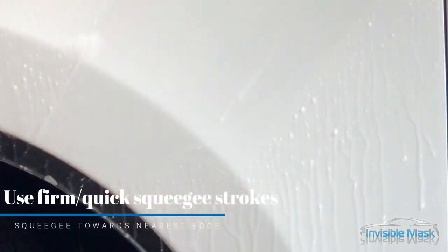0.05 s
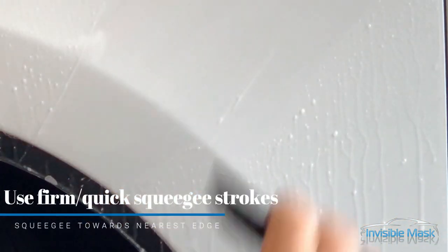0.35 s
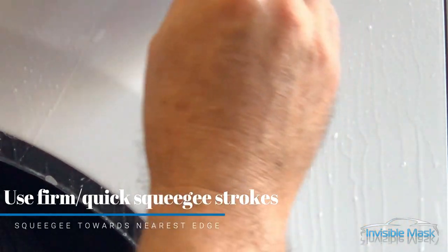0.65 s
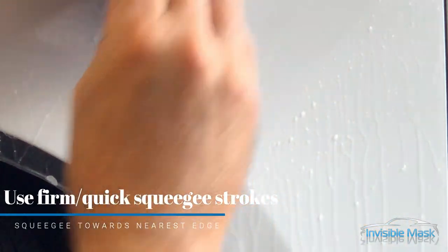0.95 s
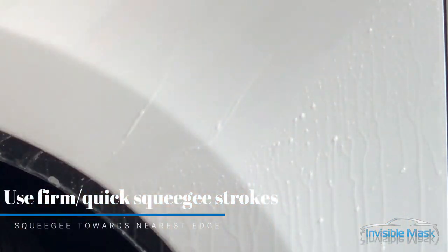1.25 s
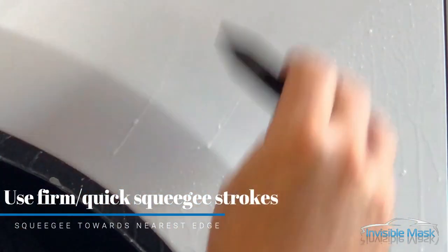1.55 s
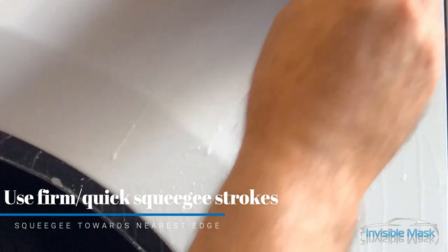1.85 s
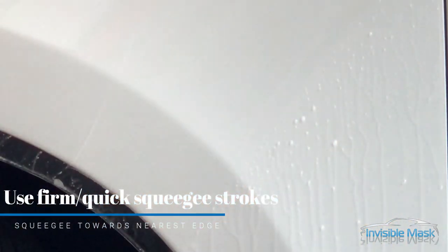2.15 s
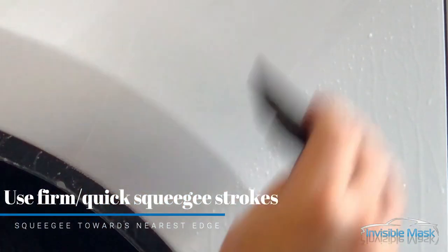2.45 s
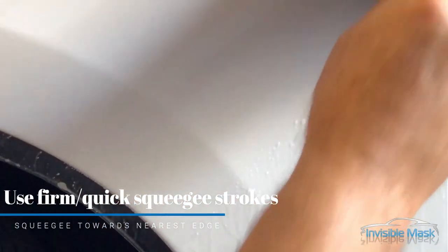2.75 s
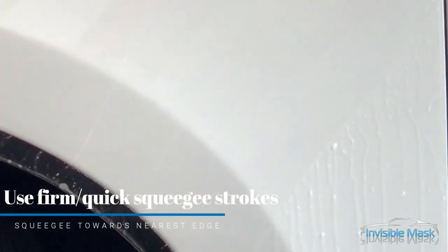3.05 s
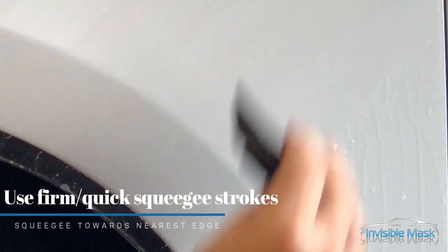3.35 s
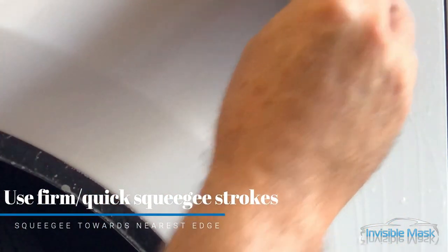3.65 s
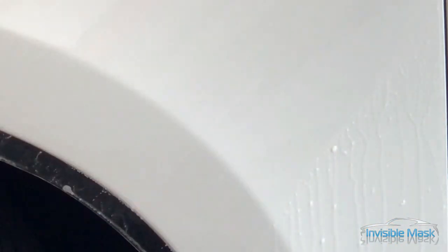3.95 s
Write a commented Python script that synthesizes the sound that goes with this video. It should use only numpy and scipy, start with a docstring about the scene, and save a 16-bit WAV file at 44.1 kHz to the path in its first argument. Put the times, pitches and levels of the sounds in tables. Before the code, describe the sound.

A squeegee is pulled quickly over wet film on a car panel, close up. A sharp knock with a spit of water comes right at the start, followed by others at about 1.1, 2.1, 3.0 and 3.9 seconds. Softer knocks precede them as the blade lands, and faint swishes accompany the strokes. The sheet metal rings briefly each time. A quiet, low workshop ventilation hum continues throughout.

```python
"""Squeegee on a wet car wing

A squeegee is pulled in quick firm strokes over wet film on a car's wing panel. The blade lands with a
soft knock, swishes, and snaps off the edge with a spit of water and a louder knock. The sheet metal
rings, treble first, as high bending waves travel faster. Around it lies a workshop's low steady hum."""
import sys
import numpy as np
from scipy import signal
from scipy.fft import rfft, irfft
from scipy.io import wavfile

SR = 44100
rng = np.random.default_rng(int(sys.argv[2]) if len(sys.argv) > 2 else 0)


def int16_out(signal):
    """Quantize to a 16-bit WAV file."""
    q = np.round(np.clip(np.atleast_2d(signal).T, -1, 1) * 32767)
    wavfile.write(sys.argv[1], SR, q.astype(np.int16))


N = 176400

# Tone of the ventilation. Each row: frequency in Hz, relative level in dB.
AIR_SPECTRUM = [(15, -60), (25, -71), (29, -5), (36, -8.5), (59, 1.5), (72, -8.5), (82, -23.5), (99, -7.5),
                (120, -4.5), (152, -19.5), (248, -15), (299, -22), (333, -17.5), (461, -25), (749, -24),
                (1390, -30), (15800, -51.5)]
# The workshop's reverb. Each row: frequency in Hz, time to fall 60 dB in seconds.
ROOM_T60 = [(100, 0.61), (500, 0.41), (3000, 0.46), (8000, 0.33), (15000, 0.36)]
# The blade rubbing over the wet film. Each row: peak time in seconds, level in dB, centre in Hz,
# width in octaves, rise in seconds, decay in seconds.
SWISHES = [(.028, -64.5, 2940, 1.16, 0.018, 0.02), (1.175, -69, 2350, 0.93, 0.045, 0.07),
           (1.33, -77, 10000, .3, 0.01, 0.037), (1.99, -83, 7000, 2, 0.067, 0.02),
           (2.2, -68.5, 2500, 1.1, 0.049, 0.018), (3.075, -62, 2160, 1.06, 0.042, 0.032),
           (3.86, -78, 2800, 0.95, .03, 0.03)]
# Blade snaps and water spitting from under it. Each row reads as for the swishes.
SPITS = [(.0378, -51.5, 12400, 0.18, 0.00058, 0.0015), (.0408, -49.5, 12400, .4, .0004, .0015),
         (.0475, -58, 8000, 3, 0.0048, 0.0034), (.1826, -78, 13600, 0.48, .001, 0.004),
         (.2479, -80, 11000, 0.51, .001, 0.0076), (.9663, -68, 7900, 0.43, 0.00054, 0.0013),
         (1.142, -53.5, 11700, 0.73, 0.0051, 0.0077), (1.1462, -47.5, 5200, 3.9, 0.0051, 0.0019),
         (1.2635, -72, 13000, .25, .0005, .001), (1.318, -61.5, 10500, 0.3, 0.0011, 0.0022),
         (2.074, -71, 3800, 0.32, 0.0013, 0.0051), (2.118, -64, 3500, 0.73, 0.0024, 0.0017),
         (2.127, -67, 7460, 1.1, .003, 0.011), (2.156, -57, 9700, 0.27, 0.0018, 0.0024),
         (2.158, -57, 2380, 0.93, 0.0024, 0.0082), (2.823, -73, 2950, 0.43, .0005, 0.0022),
         (3.0058, -46, 5150, 0.58, 0.00044, 0.0018), (3.012, -56, 2980, 1.5, 0.0027, 0.009),
         (3.0555, -51, 9000, 0.72, 0.0022, .0025), (3.056, -51, 2400, 0.082, 0.0018, 0.0062),
         (3.057, -53, 1980, 0.65, 0.0045, 0.006), (3.3554, -71, 7900, 0.44, 0.00052, 0.0012),
         (3.8493, -76, 10000, 0.89, .001, .003), (3.916, -73.5, 4970, 0.72, 0.00038, 0.0051)]
# The blade's knocks. Each row: start in seconds, level in dB, then bass, low-mid, treble, edge,
# hardness and ring, all as offsets in dB.
KNOCKS = [(-.012, -39, -2, 0, 2, 2.5, -5, -15.5), (0.0539, -28.5, -3, 0, -5, -5, 6.5, 2.5),
          (0.9687, -43, -2.5, 5, 3, -1.5, -4, -0.5), (1.14, -32.5, 12, 7.5, -2, -2, -4, -1),
          (1.311, -59, 11, 6, 9.5, 1, -12, -9), (1.833, -51.5, 16, 9.5, -10, -10, -8, -2),
          (1.846, -42, -20, -5, -10, -5, -2, -6), (2.069, -57, 9, 8, 3, 5, -8, -0.5),
          (2.1147, -31.5, 2, -5, -0.5, 2, 6, 2.5), (2.268, -65.5, 21.5, 7, -6, -9, -1, -6),
          (2.817, -45.5, 6.5, 8.5, 0, -1.5, 0, 2), (2.973, -54, 5, 11, 3, -2, -13, -4),
          (3.005, -29, 5.5, -2.5, -4.5, -0.5, 3.5, 0), (3.731, -49.5, 7, 6, -8, -14, -9, -10.5),
          (3.912, -35, -5, -4.5, 0.5, -6.5, 2.5, -1)]
# A knock's EQ bands: the centres of bass, low-mid, body, treble and edge in Hz.
EQ_BANDS_HZ = [140, 270, 430, 1100, 2000]
# A knock's attack, the first wave front. Each row: frequency in Hz, relative level in dB.
FRONT_SPECTRUM = [(40, -10.5), (110, -6.5), (250, -8.5), (450, -4), (660, -13), (830, -26.5), (1080, -7),
                  (1350, -24), (1600, -22), (2500, -35), (5000, -57), (16000, -59)]
# The panel's main modes. Each row: pitch in Hz, relative level in dB, time to fall 60 dB in seconds.
PANEL_MODES = [(66.9, -20.5, 0.47), (87.6, -19.5, 0.38), (127.5, -19, 0.3), (147.3, -15.5, 0.41),
               (255.6, -25.5, .22), (283, -16, 0.45), (312, -20, 0.4), (384, -15, 0.079), (430, -3, 0.16),
               (427, -15, .33), (464.7, -18.5, 0.3), (560, -21.5, 0.32), (658, -25.5, .28),
               (794, -22, 0.24), (1033, -19, 0.045), (1067.5, -28, 0.09), (1215, -30.5, 0.42),
               (1397, -37, 0.34), (1530, -22.5, 0.092), (1642, -31.5, 0.31), (1866, -26.5, 0.12)]
# The wash of weaker modes. Each row: frequency in Hz, relative level in dB.
WASH_SPECTRUM = [(40, -31.5), (80, -13), (200, -4.5), (290, -2), (500, 0.5), (750, -9), (1100, -11),
                 (1700, -20.5), (2800, -34), (6000, -43), (16000, -55)]
# How that wash dies. Each row: frequency in Hz, time to fall 60 dB in seconds.
WASH_T60 = [(100, 0.85), (400, 0.24), (1000, 0.42), (3000, 0.39)]

AIR_DB, AIR_LOW_CUT_HZ = -67.5, 47.6
HUM_DB, HUM_HZ, HUM_WANDER_HZ = -72.5, 55, 1.3
ROOM_RISE_S, WATER_SEND_DB, PANEL_SEND_DB = 0.0011, -10, -14
FRONT_DB, WASH_DB = 35, 2.5
RIM_ECHO_S, RIM_ECHO_DB = 0.00478, -7.5  # the front returns from the rim of the panel
RING_RISE_S = 0.00051
SETTLE_S, SETTLE_FADE_S, SETTLE_DB = 0.045, 0.0023, -4.5
BEND_S, BEND_HZ = 0.010, 418  # travel time of a bending wave of this pitch; higher ones come sooner


def amp(db):
    """Decibels to gain."""
    return 10 ** (np.asarray(db) / 20)


def unit(x):
    """Scales to rms 1."""
    return x / np.sqrt(np.mean(x ** 2) + 1e-20)


def curve(points, hz):
    """Reads a table along log frequency."""
    f, value = np.transpose(points)
    return np.interp(np.log(hz + 1), np.log(f + 1), value)


def add(mix, start_s, sound):
    """Drops a sound into the mix, trimming any overhang."""
    at = round(start_s * SR)
    sound = sound[max(-at, 0):]
    part = mix[max(at, 0):][:len(sound)]
    part += sound[:len(part)]


def dying_noise(t60s):
    """One second of noise in which each band dies at its own speed."""
    hz, t, bands = signal.stft(rng.standard_normal(SR), SR, nperseg=256)
    fade = amp(-60 * t / curve(t60s, hz)[:, None])
    return signal.istft(bands * fade, SR, nperseg=256)[1][:SR]


def workshop_bed():
    """Steady ventilation noise with a wavering low hum."""
    hz = np.fft.rfftfreq(N, 1 / SR)
    low_cut = 1 - 1 / (1 + (hz / AIR_LOW_CUT_HZ) ** 10)
    air = irfft(rfft(rng.standard_normal(N)) * amp(curve(AIR_SPECTRUM, hz)) * low_cut, N)
    wander = unit(irfft(rfft(rng.standard_normal(N)) * hz * np.exp(-(hz / 3) ** 2), N))
    hum = np.sin(2 * np.pi * np.cumsum(HUM_HZ + HUM_WANDER_HZ * wander) / SR)
    return amp(AIR_DB) * unit(air) + amp(HUM_DB) * unit(hum)


def workshop_reverb(x):
    """The workshop's reflections blur into a short diffuse tail."""
    tail = dying_noise(ROOM_T60) * np.minimum(np.arange(SR) / SR / ROOM_RISE_S, 1)
    return signal.fftconvolve(x, tail / np.linalg.norm(tail))[:N]


def water_fizz(bursts, grain_db):
    """Bursts of tiny droplets that swell and die away, each with its own tail in the workshop."""
    out = np.zeros(N)
    t = (np.arange(SR) - SR // 2) / SR  # zero at the peak of a burst
    hz = np.fft.rfftfreq(SR, 1 / SR)
    for peak_s, db, centre_hz, octaves, rise_s, decay_s in bursts:
        droplets = rng.standard_normal(SR) * amp(grain_db * np.minimum(rng.exponential(1, SR), 4))
        band = np.exp(-0.5 * (np.log2((hz + 1) / centre_hz) / octaves) ** 2)
        envelope = amp(db) * np.exp(np.where(t < 0, t / abs(rise_s), -t / abs(decay_s)))
        add(out, peak_s + t[0], envelope * unit(irfft(rfft(droplets) * band)))
        fade_in = 1 - np.exp(-(t - t[0]) / (ROOM_RISE_S + abs(rise_s)))
        tail = (irfft(rfft(dying_noise(ROOM_T60)) * band) * fade_in)[:SR // 2]
        send = amp(WATER_SEND_DB) * np.linalg.norm(envelope)
        add(out, peak_s, send * tail / np.linalg.norm(tail))
    return out


def panel_ring(hz, hardness_db):
    """Spectrum of the ring: it opens slower under a soft blow and ducks as the blade settles back."""
    t = np.arange(SR) / SR
    modes = sum(amp(db - 60 * t / t60) * np.cos(2 * np.pi * f * t) for f, db, t60 in PANEL_MODES)
    attack = 1 - np.exp(-t / (RING_RISE_S * amp(-hardness_db)))
    duck = amp(SETTLE_DB * 0.5 * (1 + np.tanh((t - SETTLE_S) / SETTLE_FADE_S)))
    high_cut = 1 / (1 + (hz / 1800) ** 4)
    low_cut = hz ** 2 / (hz ** 2 + 40 ** 2)
    return rfft(modes * attack * duck) * high_cut * low_cut


def blade_knock(level_db, bass_db, low_mid_db, treble_db, edge_db, hardness_db, ring_db):
    """A wave front, its echo and the modes, smeared into a quick downward chirp by the stiff sheet."""
    hz = np.fft.rfftfreq(SR, 1 / SR)
    rim_echo = amp(RIM_ECHO_DB) * np.exp(-2j * np.pi * hz * RIM_ECHO_S) / (1 + (hz / 800) ** 2)
    front = amp(FRONT_DB + hardness_db + curve(FRONT_SPECTRUM, hz)) * (1 + rim_echo)
    ring = amp(ring_db) * panel_ring(hz, hardness_db)
    wash = amp(WASH_DB + curve(WASH_SPECTRUM, hz)) * rfft(dying_noise(WASH_T60))
    eq_db = curve(list(zip(EQ_BANDS_HZ, [bass_db, low_mid_db, 0, treble_db, edge_db])), hz)
    chirp = np.exp(-4j * np.pi * BEND_S * np.sqrt(BEND_HZ * hz))
    return irfft((front + ring + wash) * amp(level_db + eq_db) * chirp)[:SR * 3 // 4]


def scene():
    """Metal and water up close, the workshop behind, in mono."""
    metal = np.zeros(N)
    for start_s, *voicing in KNOCKS:
        add(metal, start_s, blade_knock(*voicing))
    water = water_fizz(SPITS, grain_db=2) + water_fizz(SWISHES, grain_db=2.5)
    workshop = amp(PANEL_SEND_DB) * workshop_reverb(metal) + workshop_bed()
    return (workshop + water + metal)[None]


def record(dry):
    """The microphone rolls off the sub-bass, and a steep filter trims the very top."""
    low_cut = signal.butter(6, 46, "high", fs=SR, output="sos")
    high_cut = signal.firwin(511, 15950, window=("kaiser", 9), fs=SR)
    return signal.oaconvolve(signal.sosfilt(low_cut, dry), high_cut[None], "same")


dry = scene()
out = record(dry)
int16_out(out)
```